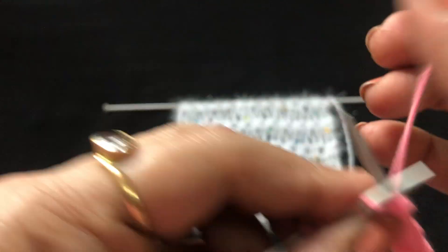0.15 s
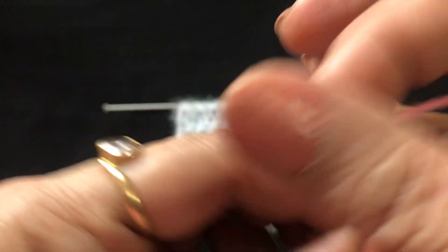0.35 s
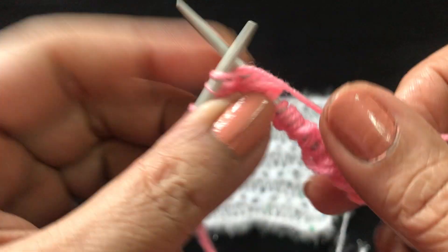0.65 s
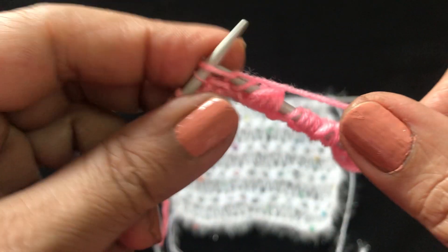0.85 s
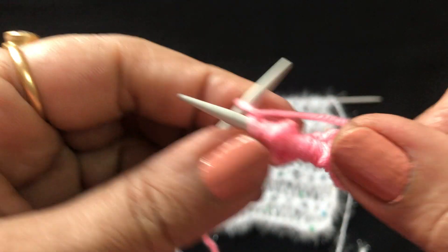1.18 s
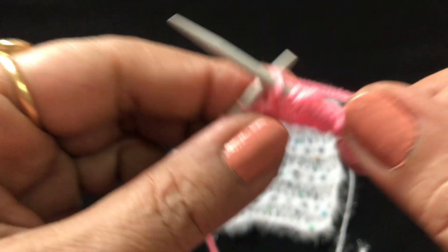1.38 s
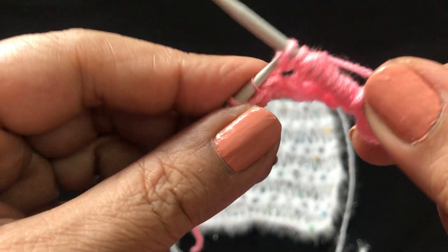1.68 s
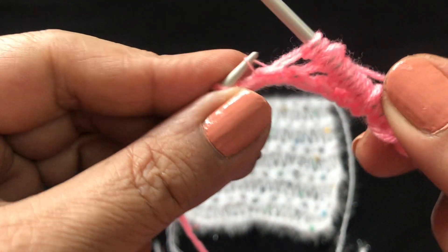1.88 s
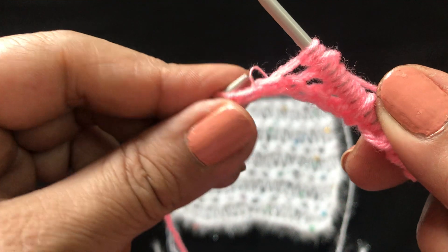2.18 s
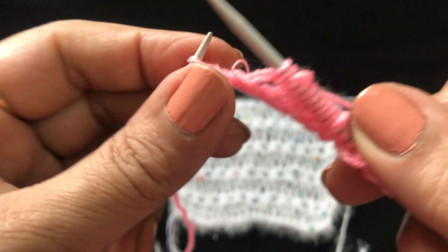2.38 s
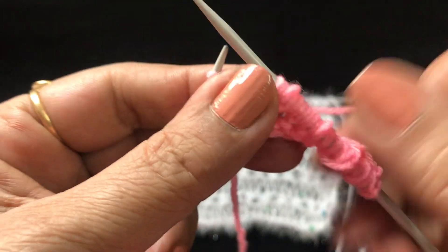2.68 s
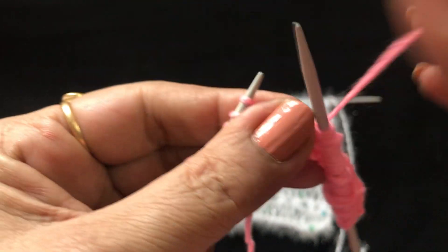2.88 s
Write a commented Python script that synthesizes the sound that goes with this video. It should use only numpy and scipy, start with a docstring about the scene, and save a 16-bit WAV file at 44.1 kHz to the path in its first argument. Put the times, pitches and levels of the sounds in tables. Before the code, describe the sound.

Metal knitting needles tick and slide lightly close to the microphone while yarn rustles. Near the end a needle knocks sharply on a table and bounces once. The quiet room hums low, and a bird calls faintly outside.

```python
"""Metal knitting needles worked by hand close to a small microphone in a quiet room.
From the start yarn rustles over a low room hum. From 0.3 s the tips tick and then slide on each other,
with a short bright ring that the microphone's 13 kHz peak colours. A faint far tone comes and goes
twice. From about 0.9 s a bird calls far off outside. At 2.9 s a needle end knocks on the table and
bounces once."""
import sys
import numpy as np
from scipy import signal
from scipy.fft import rfft, irfft
from scipy.io import wavfile

SR = 44100
rng = np.random.default_rng(int(sys.argv[2]) if len(sys.argv) > 2 else 0)


def materialize(psi):
    """Save the field psi as 16-bit PCM at rate SR to the path in sys.argv[1].

    A 1-D psi becomes a single channel; in a 2-D psi each row is a channel.
    """
    bounded = np.clip(np.atleast_2d(psi).T, -1, 1)
    quanta = np.round(bounded * 32767).astype(np.int16)
    wavfile.write(sys.argv[1], SR, quanta)


N = 134505


def amp(db):
    return 10 ** (np.asarray(db) / 20)


def unit(x):
    return x / np.sqrt(np.mean(x ** 2) + 1e-20)


def add(out, start_s, x):
    i = int(start_s * SR)
    out[i:i + len(x)] += x[:max(N - i, 0)]


def drift(rate_hz):
    """Random wander: lines between knots of spread 1."""
    knots = rng.standard_normal(int(N / SR * rate_hz) + 3)
    return np.interp(np.arange(N) / SR * rate_hz, np.arange(len(knots)), knots)


def coloured(spectrum, top_hz=15900):
    """Noise of rms 1, shaped by (Hz, dB) points."""
    hz, db = np.transpose(spectrum)
    bins_hz = np.arange(N // 2 + 1) * SR / N + 1
    gain = amp(np.interp(np.log(bins_hz), np.log(hz), db)) * (bins_hz < top_hz)
    return unit(irfft(rfft(rng.standard_normal(N)) * gain, N))


def ring(x, hz, t60_s):
    """One resonance: a unit impulse starts a decaying sine of height 1."""
    r, w = amp(-60 / (t60_s * SR)), 2 * np.pi * hz / SR
    return signal.lfilter([0, np.sin(w)], [1, -2 * r * np.cos(w), r * r], x + 1e-18)


def glide(length_s, hz0, hz1):
    """Phase of a linear sweep."""
    return 2 * np.pi * np.cumsum(np.linspace(hz0, hz1, int(length_s * SR))) / SR


def contact(length_s):
    """Rough contact: a short swell of noise, energy 1."""
    age = np.arange(400) / SR / length_s
    burst = rng.standard_normal(400) * age * np.exp(-2 * age)
    return burst / np.sqrt(np.sum(burst ** 2))


# Each row: frequency in Hz, relative gain in dB, T60 in seconds.
CONTACT_RESONANCES = [(3360, -12.5, 0.0033), (4000, -12.5, 0.00094), (5480, -14.5, 0.0043),
                      (6670, -10, 0.0018), (8010, -8.5, 0.0067), (9430, -10, 0.0045), (11740, -9.5, 0.012),
                      (11700, 3.5, 0.0023), (13200, 5, 0.0021), (13620, -0.5, 0.0082),
                      (15600, -9.5, 0.0033)]

def contact_ring(force, spread_db):
    """Bare snap plus the short bright ring of the needles with the close microphone's 13 kHz peak."""
    out = amp(-5) * np.diff(force, prepend=0)
    for k, (hz, db, t60_s) in enumerate(CONTACT_RESONANCES):
        gain = amp(db - 5 + spread_db * rng.standard_normal())
        out += (-1) ** k * gain * ring(force, hz, t60_s)
    return out


# Each row: start in seconds, level in dB, contact time in seconds, relative body gain in dB.
TIP_TICKS = [(0.313, -49, .0012, -20), (0.6536, -29, 0.0024, -12), (0.661, -38, 0.002, -19),
             (0.667, -45, 0.0022, 4), (0.682, -50, 0.00157, -22), (0.973, -39.5, 0.0019, -8),
             (1.277, -33.5, 0.00064, -20), (1.401, -39.5, 0.00068, -17), (1.408, -38, 0.001, -20),
             (1.564, -53.5, 0.0014, -18), (1.689, -43, 0.0018, -19), (2.187, -58, 0.00088, -22),
             (2.579, -29, 0.00076, -31), (2.6634, -43, .0012, -22), (2.6664, -37.5, 0.0013, -22),
             (2.67, -34, 0.00095, -14), (2.7064, -62, .0012, -10)]

def ticks():
    """Tips touch: each contact excites the bright ring and a duller body resonance."""
    out = np.zeros(N)
    for start_s, db, contact_s, body_db in TIP_TICKS:
        force = np.pad(contact(contact_s), (0, 2000))
        body = amp(body_db) * ring(force, hz=3180, t60_s=0.00079)
        add(out, start_s, amp(db) * (contact_ring(force, spread_db=2.5) + body))
    return out


# Each row: start and length in seconds, start and end level in dB, start and end pitch in Hz.
TIP_SLIDES = [(0.652, 0.054, -66, -82, 9060, 9300), (0.659, 0.15, -70, -75, 13400, 13400),
              (0.647, 0.13, -65, -75.5, 11160, 11430), (0.794, .087, -73, -72, 12970, 12100),
              (0.674, 0.019, -68, -74, 6470, 7000), (0.849, 0.035, -80, -71, 8640, 8500),
              (0.954, 0.028, -75, -56, 12750, 13300), (1.276, 0.034, -63, -70, 11200, 11300),
              (1.28, 0.029, -68, -72, 13300, 13200), (1.366, 0.022, -71, -73, 8920, 9200),
              (1.4, 0.042, -55.5, -64, 12960, 13200), (1.577, 0.12, -85.5, -79, 6300, 6420),
              (1.654, 0.041, -83, -70, 13700, 13300), (2.588, .07, -84, -75, 6400, 6430),
              (2.62, 0.058, -76, -60, 12800, 13500)]

def slides(grains_per_s=6600, grit_db=2, sing_width_hz=650, sing_db=7, edge_s=0.0029):
    """Tip slides on needle: dense grains drive the ring; one band sings and moves with the contact."""
    out = np.zeros(N)
    grains = rng.uniform(-1.18, 1, N) * (rng.random(N) < grains_per_s / SR)
    steps = np.repeat(rng.standard_normal(N // 90 + 1), 90)[:N]
    grit = amp(grit_db * np.clip(steps, -2, 2))
    scrape = unit(contact_ring(grains, spread_db=0))
    lowpass = signal.butter(2, sing_width_hz / 2, fs=SR, output="sos")
    slow_noise = unit(signal.sosfilt(lowpass, grains))[::-1]
    for start_s, length_s, db0, db1, hz0, hz1 in TIP_SLIDES:
        phase = glide(length_s, hz0, hz1)
        i, t = int(start_s * SR), np.arange(len(phase)) / SR
        span = slice(i, i + len(t))
        fade = np.clip(np.minimum(t, length_s - t) / edge_s, 0, 1)
        level = amp(db0 + (db1 - db0) * t / length_s)
        offset = i + int(hz0)  # decorrelates overlapping slides
        sing = amp(sing_db) * slow_noise[offset:][:len(t)] * np.sin(phase)
        add(out, start_s, fade * grit[span] * level * (scrape[span] + sing))
    return out


# Each row: time in seconds, level in dB.
RUSTLE_LEVELS = [(0, -71), (.1, -82), (.28, -77), (.32, -67), (.36, -86), (.5, -76.5), (.58, -80),
                 (.65, -69), (.78, -74.5), (.87, -66), (0.931, -73), (1.06, -82), (1.16, -69.5),
                 (1.27, -63.5), (1.34, -66.5), (1.47, -69), (1.52, -78), (2.5, -81), (2.6, -72.5),
                 (2.79, -70), (2.88, -75.5)]
# Each row: frequency in Hz, relative noise density in dB.
YARN_SPECTRUM = [(1500, -20), (2530, -10.5), (2740, -13), (2990, -14), (4940, -10.5), (8500, -9),
                 (10400, -9), (12200, -6), (13100, -1.5), (14000, -7.5), (15800, -15)]

def rustle(flicker_db=1.8, grain_db=1.5):
    """Yarn and fingers rub: soft bright noise that flickers and breaks into fine grains."""
    times_s, db = np.transpose(RUSTLE_LEVELS)
    level_db = np.interp(np.arange(N) / SR, times_s, db)
    roughness_db = flicker_db * drift(29.83) + grain_db * drift(400)
    return amp(level_db + roughness_db) * coloured(YARN_SPECTRUM)


# Each row: start in seconds, level in dB, relative table gain in dB, ping in Hz, relative ping gain in dB.
END_KNOCKS = [(2.9068, -2.5, -2, 4330, -20), (2.9079, -11, -2.5, 4320, -14.5),
              (2.9085, -18.5, -3, 2900, -13.5), (3.025, -29, 2.5, 5040, -10.5)]
# Each row: frequency in Hz, relative gain in dB, T60 in seconds.
SHAFT_MODES = [(3895, -26, 0.035), (8950, -42, .03), (10847, -36.5, 0.17), (11770, -46, 0.06)]
# Each row: notch frequency in Hz, Q.
REFLECTION_NOTCHES = [(10000, 4.6), (14800, 9)]

def knocks():
    """Needle end hits the table: a crack, the free shaft rings, the table answers below."""
    out = np.zeros(N)
    impulse = signal.unit_impulse(9400)
    shaft = amp(0.5) * sum(amp(db) * ring(impulse, hz, t60_s) for hz, db, t60_s in SHAFT_MODES)
    table = table_top(len(impulse))
    for start_s, db, table_db, ping_hz, ping_db in END_KNOCKS:
        force = np.pad(contact(length_s=0.0004), (0, 9000))
        crack = contact_ring(force, spread_db=0.47)
        ping = amp(ping_db) * ring(impulse, ping_hz, t60_s=0.013)
        add(out, start_s, amp(db) * (crack + ping + shaft + amp(table_db + 4) * table))
    for hz, q in REFLECTION_NOTCHES:  # cancellation by the table's reflection
        out = signal.lfilter(*signal.iirnotch(hz, q, SR), out)
    return out


# Each row: frequency in Hz, relative gain in dB, T60 in seconds.
TABLE_MODES = [(48.3, -39, 0.25), (398, -23, 0.05), (540, -33, .03), (688, -24, 0.042), (887, -25, 0.034),
               (1090, -30, 0.018), (2010, -34, 0.034)]

def table_top(samples, from_hz=283, to_hz=52, sag_s=0.012, thump_t60_s=0.14, swell_s=0.0047):
    """Struck table: modes swell in, with a thump that sags in pitch as it spreads."""
    t = np.arange(samples) / SR
    impulse = signal.unit_impulse(samples)
    modes = sum(amp(db) * ring(impulse, hz, t60_s) for hz, db, t60_s in TABLE_MODES)
    thump_hz = to_hz + (from_hz - to_hz) * np.exp(-t / sag_s)
    thump = amp(-41 - 60 * t / thump_t60_s) * np.sin(2 * np.pi * np.cumsum(thump_hz) / SR)
    return (modes + thump) * (1 - np.exp(-t / swell_s))


# Each row: frequency in Hz, relative noise density in dB.
TAIL_SPECTRUM = [(600, -13), (1000, -7), (2200, -18.5), (2900, -7), (4500, -8.5), (6400, -10.5),
                 (7200, -16), (9000, -12), (10300, -13), (11300, -8), (12000, -6.5), (13800, -2),
                 (14800, -22), (15400, -19), (15800, -20)]

def room_tail(t60_s=0.26, rise_s=0.00067, send_db=-36.5):
    """The room answers each tick and knock with decaying noise; tails add in power."""
    power, t = np.zeros(N), np.arange(SR // 2) / SR
    decay = amp(-60 * t / t60_s) * np.minimum(t / rise_s, 1)
    for start_s, db, *_ in TIP_TICKS + END_KNOCKS:
        add(power, start_s, (amp(db + send_db) * decay) ** 2)
    return np.sqrt(power) * coloured(TAIL_SPECTRUM)


# Each row: offset and length in seconds, start and end base pitch in Hz, relative level in dB.
TRILL_NOTES = [(-.055, .045, 3150, 3270, -14), (-.003, 0.022, 2920, 3230, 0), (0.031, .024, 2920, 3250, 1),
               (0.05, 0.1, 3200, 3180, -13)]
WHISTLE_NOTES = [(-0.11, 0.092, 3800, 3890, -13), (-.05, 0.053, 3980, 3760, -2),
                 (-0.02, .05, 4450, 3900, -8), (-0.069, 0.017, 2730, 2800, -1.5),
                 (-0.0025, 0.024, 3100, 4000, -9), (.0, 0.025, 3250, 2750, 2.5),
                 (-0.066, 0.29, 2750, 2730, -8.5)]
# Each row: time in seconds, level in dB, pitch factor.
TRILL_CALLS = [(.935, -66, 0.93), (1.58, -61.5, 1.02), (2.1, -61.5, 1.01), (2.61, -59, 0.96)]
WHISTLE_CALLS = [(1.245, -66.5, 1.02), (1.825, -60.5, 1.047), (2.385, -63.5, 1.005), (2.85, -62.5, 1.005)]

def bird(wobble_rad=0.9, hoarseness=0.7, flutter_hz=300):
    """Far bird: trills and whistles of short slurred notes, unsteady and hoarse."""
    out = np.zeros(N)
    wobble = np.pad(wobble_rad * drift(150), (0, SR))
    for calls, notes in ((TRILL_CALLS, TRILL_NOTES), (WHISTLE_CALLS, WHISTLE_NOTES)):
        for call_s, call_db, pitch in calls:
            for offset_s, length_s, hz0, hz1, note_db in notes:
                start_s = call_s + offset_s
                phase = glide(length_s, pitch * hz0, pitch * hz1)
                tone = np.sin(phase + wobble[int(start_s * SR):][:len(phase)])
                add(out, start_s, amp(call_db + note_db) * np.hanning(len(phase)) * tone)
    lowpass = signal.butter(2, flutter_hz, fs=SR, output="sos")
    flutter = unit(signal.sosfilt(lowpass, rng.standard_normal(N)))
    return out * (1 + hoarseness * flutter)


def outside_walls(x, t60_s=0.4, rise_s=0.016, wet_db=-4):
    """Walls outside blur the direct sound with a diffuse tail."""
    t = np.arange(SR // 2) / SR
    tail = rng.standard_normal(len(t)) * amp(-60 * t / t60_s) * np.minimum(t / rise_s, 1)
    tail /= np.sqrt(np.sum(tail ** 2))
    return x + amp(wet_db) * signal.fftconvolve(x, tail)[:N]


# Each row: frequency in Hz, relative noise density in dB.
AIR_SPECTRUM = [(30, -33), (38, -11), (157, -4), (260, -11), (400, -17), (620, -21), (900, -22.5),
                (1300, -29), (2000, -29.5), (3000, -30.5), (4800, -40.5), (6500, -41), (10400, -45),
                (13000, -40), (15800, -44)]
# Each row: frequency in Hz, nominal width in Hz, level in dB.
HUM_RESONANCES = [(53, 11, -66), (98, 10, -77.5), (128.1, 14, -66.5), (152.6, 7.4, -61.5),
                  (194.6, 6.6, -67), (896, 6.4, -81.5)]

def room_hum(air_db=-60, wander_db=1.0):
    """Room air, plus noise in a few narrow low resonances."""
    out = amp(air_db + wander_db * drift(7.875)) * coloured(AIR_SPECTRUM)
    for hz, width_hz, db in HUM_RESONANCES:
        resonance = ring(rng.standard_normal(N + SR), hz, t60_s=2.64 / width_hz)
        out += amp(db) * unit(resonance[SR:])  # skip 1 s of build-up
    return out


# Each row: start and length in seconds, start and end pitch in Hz, level in dB.
FAR_GLIDES = [(0.467, 0.425, 395, 444, -68.5), (1.52, 0.378, 400.3, 388.5, -67)]

def far_tone():
    """A faint far tone swells, glides and fades."""
    out = np.zeros(N)
    for start_s, length_s, hz0, hz1, db in FAR_GLIDES:
        phase = glide(length_s, hz0, hz1)
        add(out, start_s, amp(db) * np.sqrt(np.hanning(len(phase))) * np.sin(phase))
    return out


def scene():
    """Mono mix of knitting and background."""
    knitting = ticks() + knocks() + slides() + room_tail() + rustle()
    return (knitting + outside_walls(bird()) + room_hum() + far_tone())[None]


def record(dry, low_hz=44, stop_hz=17000):
    """The microphone drops the deepest bass; the top is cut."""
    highpass = signal.butter(6, low_hz, "high", fs=SR, output="sos")
    lowpass = signal.cheby2(20, 70, stop_hz, fs=SR, output="sos")
    return signal.sosfilt(lowpass, signal.sosfilt(highpass, dry))


dry = scene()
out = record(dry)
materialize(out)
```